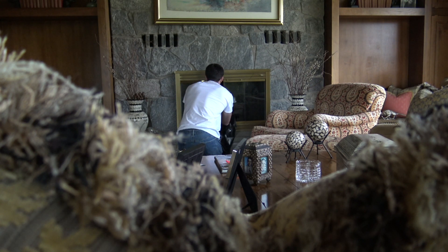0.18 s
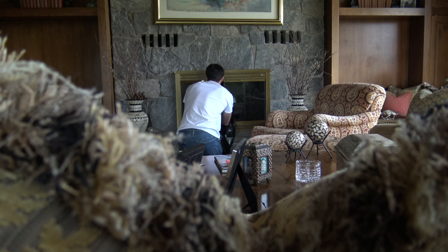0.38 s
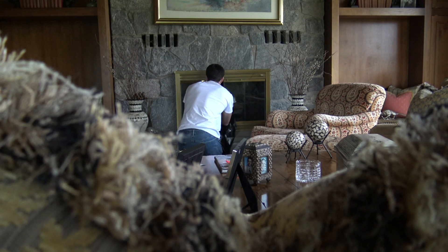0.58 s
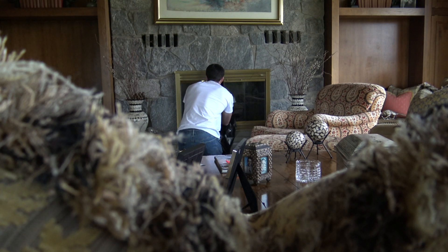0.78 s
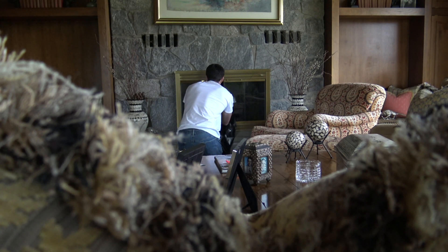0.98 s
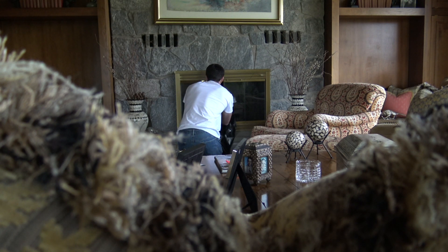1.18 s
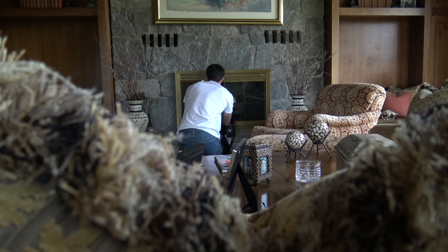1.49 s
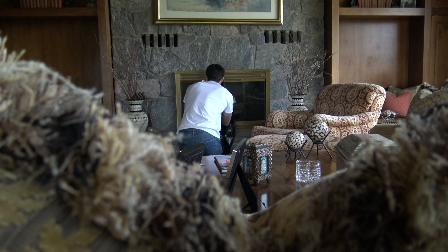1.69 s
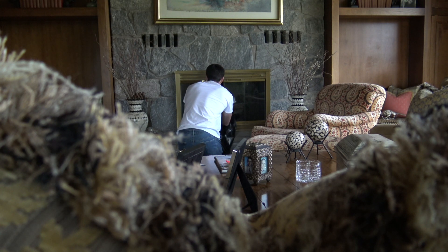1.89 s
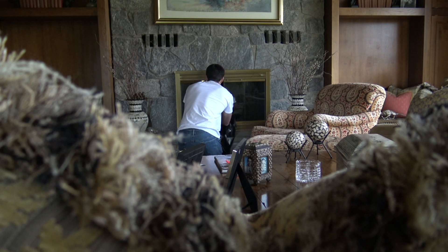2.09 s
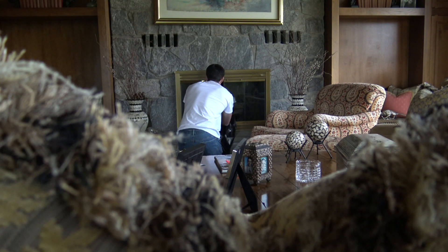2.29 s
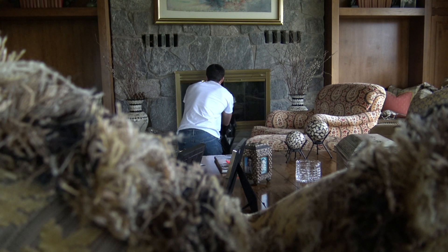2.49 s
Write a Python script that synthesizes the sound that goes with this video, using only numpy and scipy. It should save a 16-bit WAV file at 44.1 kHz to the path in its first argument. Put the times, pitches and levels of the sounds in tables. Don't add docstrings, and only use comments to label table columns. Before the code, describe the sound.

Six rattling knocks on metal-framed glass fireplace doors, loose joints chattering, in a living room

```python
import sys
import numpy as np
from scipy import signal
from scipy.fft import rfft, irfft, next_fast_len
from scipy.io import wavfile
from scipy.ndimage import map_coordinates

SR = 44100
rng = np.random.default_rng(int(sys.argv[2]) if len(sys.argv) > 2 else 0)


def volts_from_decibels(level):
    exponent = np.asarray(level, float) / 20
    return 10 ** exponent


def master_out(mix):
    frames = np.transpose(np.atleast_2d(mix))
    ceiling = np.clip(frames, -1, 1)
    pcm = np.round(ceiling * 32767).astype(np.int16)
    wavfile.write(sys.argv[1], SR, pcm)


N = 114660


def unit(x):
    return x / np.sqrt(np.mean(x ** 2) + 1e-20)


def early(x):
    return x / np.sqrt(np.mean(x[:SR // 20] ** 2))


def along(points, hz):
    f, v = np.transpose(points)
    return np.interp(np.log(hz + 1), np.log(f + 1), v)


def filtered(x, response):
    m = next_fast_len(x.shape[-1] + SR // 2)
    hz = np.fft.rfftfreq(m, 1 / SR)
    return irfft(rfft(x, m) * response(hz), m)[..., :x.shape[-1]]


def causal(gain):
    cepstrum = irfft(np.log(gain + 1e-6))
    half = len(cepstrum) // 2
    cepstrum[1:half] *= 2
    cepstrum[half + 1:] = 0
    return np.exp(rfft(cepstrum))


def add(out, x, s):
    part = out[max(round(s * SR), 0):][:len(x)]
    part += x[:len(part)]


def modes(table, f):
    total = 0
    for k, (center, width, db) in enumerate(table):
        level = volts_from_decibels(db + 2 * rng.normal())
        resonance = 1j * f * width / (center * center - f * f + 1j * f * width)
        total = total + (-1) ** k * level * resonance
    return total


def contacts():
    contacts_per_s, size_db, clumps_per_s, clump_db = 3500, 2.5, 110, 2.5
    size = volts_from_decibels(size_db * np.clip(rng.standard_normal(SR), -2, 2))
    clumps = map_coordinates(rng.standard_normal(300), [np.arange(SR) * clumps_per_s / SR])
    size *= volts_from_decibels(clump_db * clumps)
    return (rng.random(SR) < contacts_per_s / SR) * size * rng.choice([-1, 1], SR)


# frequency [Hz], t60 [s]
ROOM_DECAY = [(60, 1), (300, 0.62), (1500, 0.57), (5000, 0.65), (14000, 0.59)]


def room(x):
    tail_db, delay_s = -2.5, .004
    hz, t, z = signal.stft(rng.standard_normal(len(x)), SR, nperseg=256)
    decay = volts_from_decibels(-60 * t / along(ROOM_DECAY, hz)[:, None])
    tail = signal.istft(z * decay, SR, nperseg=256)[1]
    delayed = np.pad(x, (round(delay_s * SR), 0))
    wet = signal.fftconvolve(delayed, tail / np.linalg.norm(tail))
    return x + volts_from_decibels(tail_db) * wet[:len(x)]


def steady_noise(spectrum, db):
    noise = filtered(rng.standard_normal(N), lambda f: volts_from_decibels(along(spectrum, f)))
    return volts_from_decibels(db) * unit(noise)


# frequency [Hz], density [dB per Hz]
AIR_SPECTRUM = [(20, -1), (120, -7), (270, -7.5), (400, -12), (630, -20.5), (950, -12.5), (1150, -12.5),
                (1500, -24), (16000, -32.5)]


def air():
    return steady_noise(AIR_SPECTRUM, -56.5)


# frequency [Hz], density [dB per Hz]
HISS_SPECTRUM = [(4500, -40), (5500, 0.1), (11000, -1.5), (12500, -30)]


def port_hiss():
    return steady_noise(HISS_SPECTRUM, -81.5)


# time_s [s], level_db [dB]
SLEEVE_LEVEL = [
    (.10, -80.5),
    (0.162, -56),
    (0.198, -53.5),
    (.205, -68.5),
]


def sleeve():
    s, db = np.transpose(SLEEVE_LEVEL)
    noise = filtered(rng.standard_normal(N), lambda f: volts_from_decibels(-12 * np.log2((f + 1) / 4000) ** 2 / 4))
    return unit(noise) * volts_from_decibels(np.interp(np.arange(N) / SR, s, db, -120, -120))


# frequency [Hz], level [dB]
MESH_SPECTRUM = [(2000, -26), (5500, 5.5), (10000, -3.5), (15000, -15.5)]
# start_s [s], level_db [dB], time to fullest peak_s [s]
MESH_SWINGS = [
    (0.202, -43.5, 0.04),
    (.413, -35.5, 0.055),
    (.63, -36.5, .04),
    (0.848, -32.5, 0.054),
    (1.066, -36, 0.049),
    (1.28, -39, 0.048),
    (1.53, -62, 0.076),
]


def mesh():
    out, t = np.zeros(N), np.arange(SR) / SR
    for s, db, peak_s in MESH_SWINGS:
        links = unit(filtered(contacts(), lambda f: volts_from_decibels(along(MESH_SPECTRUM, f))))
        swing = t / peak_s * np.exp(1 - t / peak_s)
        add(out, volts_from_decibels(db) * links * swing, s)
    return out


# center [Hz], width [Hz], level [dB]
FRAME_MODES = [(1400, 42, -2.5), (1541, 31, 4.5), (1990, 52, -9), (2557, 33, 1.5), (3340, 160, -15.5),
               (3800, 150, -19), (4520, 230, -8.5), (5160, 73, -18)]
# frequency [Hz], density [dB per Hz]
CONTACT_SPECTRUM = [(88, -41.5), (150, -18.5), (334, -9), (448, -22.5), (555, -7), (821, -13),
                    (3350, -17.5), (9820, -25), (16000, -38)]


def metal(force, tilt_db):
    def body(f):
        tilt = tilt_db * np.log2((f + 200) / 2000)
        broad = causal(volts_from_decibels(along(CONTACT_SPECTRUM, f) + tilt))
        return broad * (1 + volts_from_decibels(5) * modes(FRAME_MODES, f))
    return filtered(force, body)


# center [Hz], width [Hz], level [dB]
CATCH_MODES = [(3350, 500, 8.5), (2100, 400, 2.5), (5200, 900, -10.5)]
# start_s [s], level_db [dB], chatter t60_s [s],
# brightness tilt_db [dB per octave], catch burst_db [dB]
DOOR_SLAPS = [
    (.2030, -28.5, 0.77, -0.74, -29),
    (.4130, -21, 0.67, -0.85, -27),
    (0.6291, -20.5, 0.43, -0.3, -27.5),
    (.8490, -21, 0.48, -0.16, -25.5),
    (1.0656, -21.5, 0.68, -0.5, -26.5),
    (1.2800, -25, 0.29, -1.43, -31.5),
    (1.535, -47.5, 0.45, -1.5, -59.5),
]


def chatter():
    rise_s, burst_s = .014, 0.025
    out, t = np.zeros(N), np.arange(SR) / SR
    for s, db, t60, tilt_db, burst_db in DOOR_SLAPS:
        force = contacts() * volts_from_decibels(-60 * t / max(t60, .02)) * np.minimum(1, 0.45 + t / rise_s)
        add(out, volts_from_decibels(db) * early(room(metal(force, tilt_db))), s)
        catch_force = contacts() * np.exp(-(t / burst_s) ** 2)
        burst = filtered(catch_force, lambda f: modes(CATCH_MODES, f))
        add(out, volts_from_decibels(burst_db) * early(room(burst)), s)
    return out


# start_s [s], level_db [dB], ringing mode pitch_hz [Hz]
HARD_CONTACTS = [(.213, -40, 3300), (.421, -33, 2900), (.425, -36, 1440), (.638, -36, 5400),
                 (.646, -28, 2030), (.651, -34, 1500), (.672, -35, 550), (.863, -32, 2030),
                 (.902, -34, 2030), (1.288, -35, 3300), (1.22, -48, 3300), (1.077, -36, 3300),
                 (1.095, -38, 2030), (.448, -38, 1700)]


def clacks():
    width_hz, ring_db = 110, 14
    out, impulse = np.zeros(N), signal.unit_impulse(SR)
    for s, db, hz in HARD_CONTACTS:
        blow = filtered(impulse, lambda f: -0.5 + modes([(hz, width_hz, ring_db)], f))
        add(out, volts_from_decibels(db) * early(room(metal(blow, tilt_db=-3.5))), s)
    return out


# center [Hz], width [Hz], level [dB]
PANE_MODES = [(36.6, 7.6, -3.5), (64.4, 9.4, -9), (123.4, 25, -2), (200, 40, -9), (249.7, 29, -2.5),
              (348, 70, -3), (533, 65, -0.5), (587.4, 53, -2.5), (734, 33, -19.5), (923, 42.4, -9)]
# start_s [s], level_db [dB], length_s [s], favoured pitch_hz [Hz]
PANE_PUSHES = [(0.173, -53.5, 0.021, 497), (0.195, -31, 0.053, 557), (0.348, -34.5, 0.0047, 603),
               (0.397, -28.5, .008, 605), (0.417, -26, 0.028, 450), (0.625, -25, 0.045, 470),
               (0.836, -33, 0.0088, 557), (0.849, -23, 0.035, 463), (0.99, -32, 0.023, 408),
               (1.064, -26.5, 0.058, 500), (1.208, -37.5, 0.018, 534), (1.271, -26.5, 0.027, 510),
               (1.335, -36.5, 0.01, 540), (1.398, -46.5, 0.013, 560), (1.533, -51, 0.082, 379.8),
               (1.744, -50.5, 0.074, 208)]


def thuds():
    bass, breadth = 0.87, 0.91
    out, t = np.zeros(N), np.arange(SR) / SR
    for s, db, length, hz in PANE_PUSHES:
        envelope = np.exp(-(t / length) ** 2) * np.minimum(1, 0.56 + t / (0.75 * length))
        force = rng.standard_normal(SR) * envelope

        def pane(f):
            low = bass / (1 + 1j * f / 150)
            favoured = 1j * f * hz / (hz * hz - f * f + 1j * f * hz * breadth)
            softness = 1 + 1j * f / (2 * hz)
            return modes(PANE_MODES, f) * (low + favoured) / softness
        add(out, volts_from_decibels(db) * early(room(filtered(force, pane))), s)
    return out


# frequency [Hz], level [dB]
PORT_DIFFERENCE = [(100, -32.5), (1000, -23.5), (2200, -21), (3300, -32.5), (4500, -37), (6300, -30),
                   (8000, -42)]


def scene():
    mid = chatter() + mesh() + clacks() + thuds() + sleeve() + air()
    t = np.arange(SR // 10) / SR
    scatter = rng.standard_normal(SR // 10) * np.exp(-t / .01)
    scattered = signal.fftconvolve(mid, scatter / np.linalg.norm(scatter))[:N]
    side = filtered(scattered, lambda f: volts_from_decibels(along(PORT_DIFFERENCE, f))) + port_hiss()
    return np.array([mid + side, mid - side])


def roll_off(x):
    return signal.sosfilt(signal.butter(12, 16850, fs=SR, output="sos"), x)


# frequency [Hz], left minus right [dB]
CHANNEL_LEAN = [(50, 0.4), (130, 2.1), (290, 2), (640, -1.5), (1300, -3.5), (2600, -.5), (4500, 0)]


def record(dry):
    def lean(f):
        return volts_from_decibels(np.outer([.5, -.5], along(CHANNEL_LEAN, f))) * (f < 15950)
    mix = filtered(dry, lean)
    return roll_off(mix)


dry = scene()
out = record(dry)
master_out(out)
```